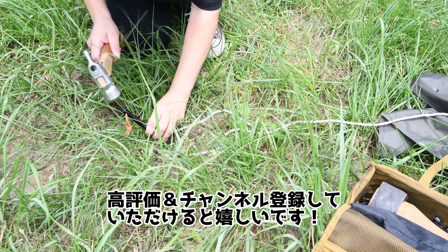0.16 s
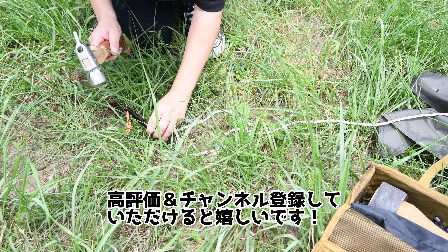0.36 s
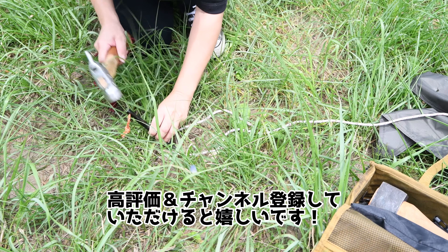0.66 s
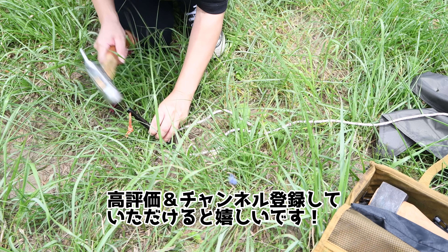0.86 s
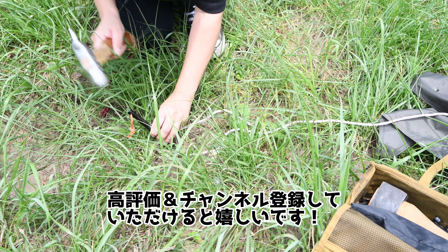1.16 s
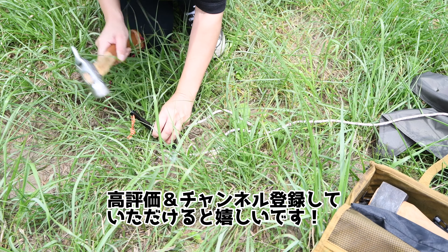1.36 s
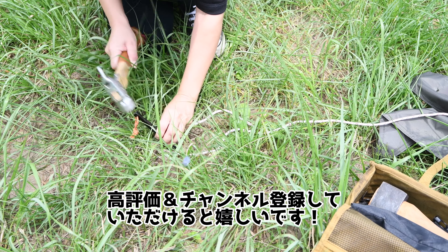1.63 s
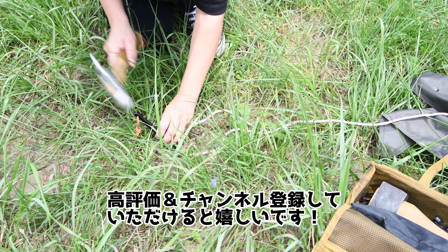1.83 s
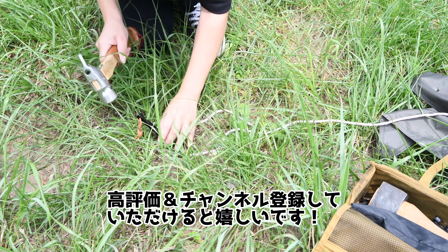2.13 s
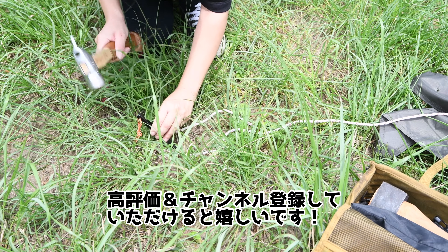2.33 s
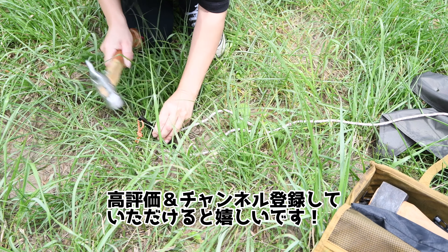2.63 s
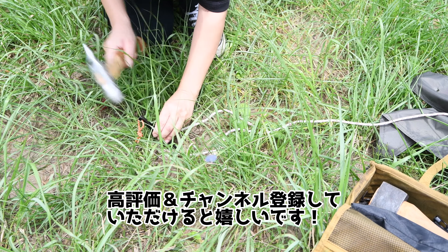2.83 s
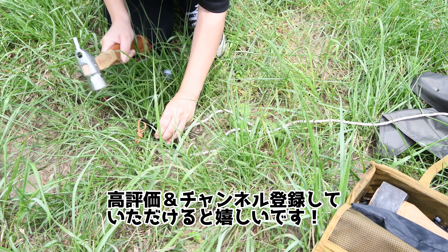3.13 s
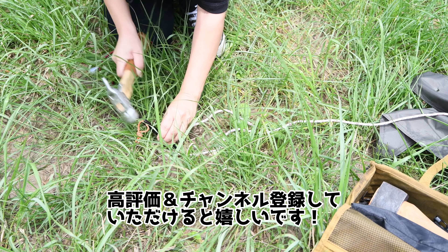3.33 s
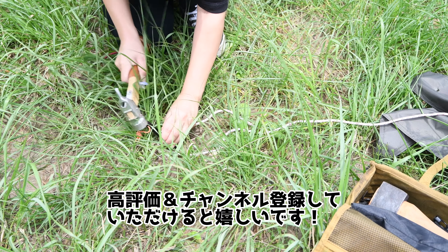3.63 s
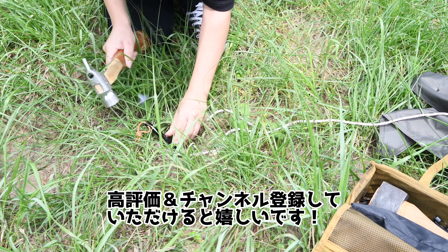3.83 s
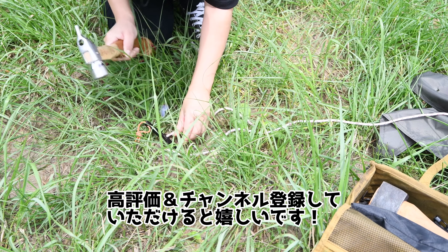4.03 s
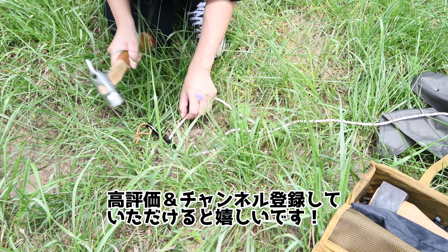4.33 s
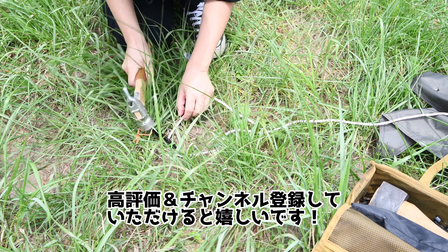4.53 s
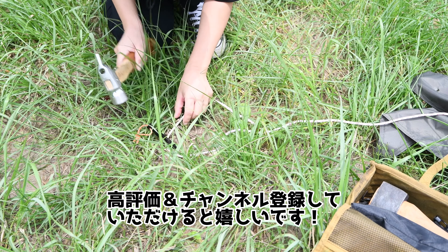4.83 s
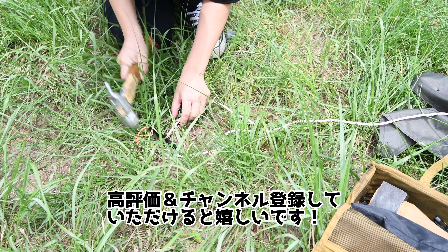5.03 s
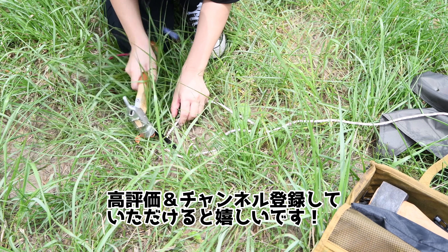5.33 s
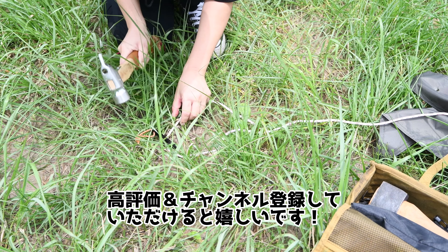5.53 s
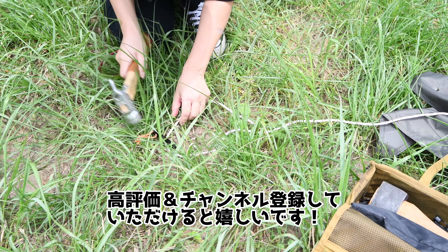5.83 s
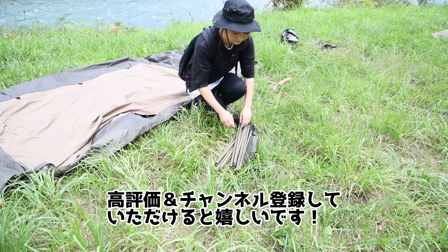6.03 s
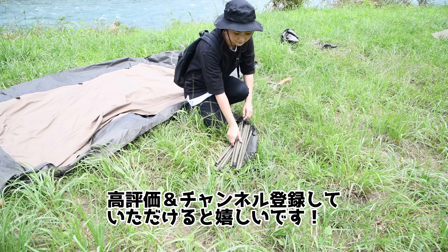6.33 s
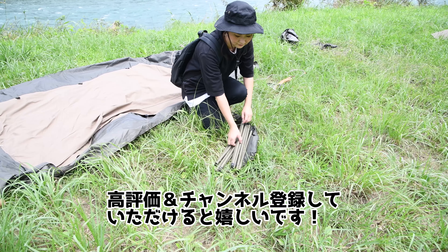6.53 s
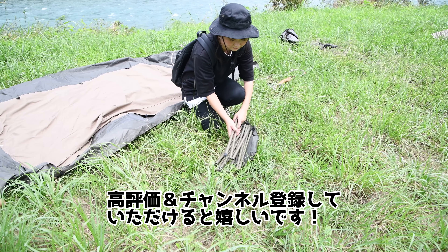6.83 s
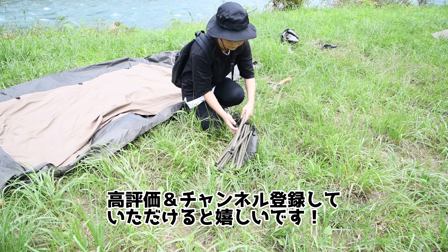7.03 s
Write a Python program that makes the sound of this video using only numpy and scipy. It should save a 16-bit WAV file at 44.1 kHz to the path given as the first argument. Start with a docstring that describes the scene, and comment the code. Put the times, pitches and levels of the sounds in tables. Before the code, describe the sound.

Outdoors on a quiet river bank, a hammer taps a tent peg close to the microphone. The sharp metallic clicks die away at once, some with a tiny rebound, and two brief pauses split them into three runs. Near the end the hammering stops and the background shifts to faint insects and a far, pulsing engine, as a few tent poles knock lightly together. The river hisses softly throughout.

```python
"""A grassy river bank. A small steel hammer drives a tent peg into turf: three runs of short, bright
blows, some with a light rebound. In the last run the peg knocks more and ticks higher; the soil damps it
within milliseconds and the grass scatters a brief tail. Behind it lie the river, a low hum and hiss.
From 6 s we are beside the tent: poles clack softly among faint insects while a far engine throbs."""
import sys
import numpy as np
from scipy import signal
from scipy.fft import rfft, irfft
from scipy.io import wavfile
from scipy.ndimage import uniform_filter1d

SR = 44100
rng = np.random.default_rng(int(sys.argv[2]) if len(sys.argv) > 2 else 0)


def transcribe(signal):
    """Save signal, clipped to [-1, 1], as a 16-bit WAV file at the path in sys.argv[1]."""
    frames = np.atleast_2d(signal).T
    limited = np.clip(frames, -1, 1)
    pcm = np.round(limited * 32767).astype(np.int16)
    wavfile.write(sys.argv[1], SR, pcm)


N = 316364
T = np.arange(N) / SR
SIZE, LEAD = 4096, 64  # samples in one hit, and ahead of its attack
AGE, HZ = np.arange(SIZE) / SR, np.fft.rfftfreq(SIZE, 1 / SR)
EARS = np.array([[1], [-1]])  # left, right
AT_TENT_S = 6.006

# Hammer blows. Each row: start in seconds, strength in dB, brightness in dB per octave, clack in dB,
# ping in dB, return time of the wave in the peg in ms, its reflection from -1 to 1.
HAMMER_BLOWS = [(0.6605, -8.5, -2, -2, -3.5, 0.17, 0.34), (1.028, -2, -2.5, -1.5, 1, 0.63, 0.42),
                (1.3561, 2.5, .3, -2.5, 3.5, 0.419, 0.33), (1.6629, 1.3, 1, 8.5, 4, 0.42, 0.43),
                (1.9829, -0.1, -0.5, 4, 4, 0.364, 0.34), (2.6328, 4.5, 1, -5, 6, 0.27, 0.3),
                (3.0008, 4, -0.5, -2.5, 7, 0.35, .3), (3.3473, 5.5, 1.5, 1.5, -6, 0.198, .27),
                (3.6925, 4.5, -1.4, -4, 3, 0.31, 0.21), (4.2708, 0.1, 0, -1.5, -4.6, 0.345, 0.44),
                (4.6424, 0, 0.5, -4, -8, 0.33, .38), (5.033, 1, -1.5, -4.5, 7, .29, 0.31),
                (5.4063, 1, 0.5, 3, 0, 0.39, -0.27), (5.7831, -0.4, -1, 1, -2, .2, 0.3)]
# The hammer falls back on the peg. Each row: start in seconds, strength in dB.
HAMMER_REBOUNDS = [(1.6944, -31), (2.0060, -31), (3.3730, -28), (3.721, -23), (4.6720, -31), (5.0526, -27),
                   (5.4244, -36), (5.8046, -28)]
# The voice of the peg standing tall. Each row: frequency in Hz, level in dB.
TALL_PEG_EQ = [(150, -29), (450, -26), (1200, -19), (1900, -18), (2400, -8.5), (3050, -0.5), (3450, -1),
               (3950, -5.5), (4700, 2), (5900, 3), (7400, 5), (9000, -2), (10800, -0.8), (12800, -7.5),
               (14200, -4.5), (15500, 4.5), (17500, -11)]
# Sunk, it knocks more, loses its middle and ticks higher. Each row: frequency in Hz, change in dB.
SUNK_PEG_EQ = [(350, 10), (700, 10), (1200, 7.5), (3000, -4.5), (4100, 3), (5000, -6), (6800, -5.5),
               (7900, -5), (9500, 4.5), (13000, 6.5), (15500, .4)]
# How knocky and high-ticking the peg sounds; it jumps up around 4 s.
# Each row: time in seconds, amount from 0 to 1.
PEG_SUNK_TONE = [(.66, 0.3), (3.35, 0), (4.27, 1), (5.78, 0.8)]
# The ring of peg and hammer head. Each row: frequency in Hz, t60 in seconds, level in dB.
STEEL_MODES = [(3080, 0.031, -82), (3570, 0.039, -47), (5200, 0.013, -63), (7470, 0.015, -43.5),
               (10700, .022, -49), (11600, 0.022, -61), (15500, .012, -57)]
# The clack of a peg bent by an off-centre hit. Each row: frequency in Hz, share from 0 to 1.
CLACK_BAND = [(2450, 0), (2900, 1), (3300, 1), (3800, 0)]
# The top ping of a square hit. Each row: frequency in Hz, share from 0 to 1.
PING_BAND = [(13000, 0), (15500, 1)]
# The two microphones face the peg differently. Each row: frequency in Hz, left minus right in dB.
PEG_BALANCE = [(2500, -2), (5000, -1.5), (7700, -0.5), (10000, -2.5), (12500, -3), (15500, 1)]
# Dull bumps on the turf between blows. Each row: start in seconds, level in dB, pitch in Hz.
TURF_BUMPS = [(4.468, -41.5, 134), (4.802, -41, 107)]
# Tent poles knock together. Each row: start in seconds, strength in dB, brightness in dB per octave.
POLE_KNOCKS = [(6.659, -7, -1), (6.9637, 3, -15), (6.968, -7, -0.5), (6.989, -6, -6), (6.991, -3.5, 0.5),
               (6.996, -5, -1.5), (7.014, -13, -4)]
# The ring of the poles. Each row: frequency in Hz, t60 in seconds, level in dB.
TUBE_MODES = [(1130, 0.019, -49), (1485, 0.026, -42.5), (1780, .02, -46), (2190, 0.032, -47.5),
              (2600, .025, -50), (2930, 0.025, -49), (4260, 0.046, -48), (5040, 0.03, -55),
              (7700, .02, -59)]
# Grass and cloth. Each row: peak time in seconds, half-width in seconds, centre in Hz, level in dB.
SOFT_RUSTLES = [(2.69, .04, 10200, -63), (6.22, .11, 13000, -68)]
# Insects in the grass. Each row: centre in Hz, bandwidth in Hz, level in dB.
INSECT_TRILLS = [(7700, 90, -70.5), (8130, 100, -71)]
# The engine's low rumble. Each row: frequency in Hz, relative level in dB.
RUMBLE_EQ = [(70, -30), (95, 0), (125, -3), (165, -31)]
# River and far land, by the peg and by the tent. Each row: frequency in Hz, relative level in dB.
RIVER_PEG_EQ = [(15, -42), (25, -17), (40, -8.5), (55, -6), (95, -8), (170, -7), (270, -9), (420, -8.5),
                (560, -13), (850, -14), (1150, -13), (2000, -16), (3200, -21.5), (5500, -31)]
RIVER_TENT_EQ = [(15, -40), (25, -5), (48, -12), (86, -3), (152, -10.5), (195, -8.5), (239, -12),
                 (299, -9.5), (350, -11.5), (392, -11.5), (645, -16.5), (1950, -18), (5500, -31),
                 (7150, -66), (12100, -120)]
# Hiss with the microphone's resonance, at both spots. Each row: frequency in Hz, relative level in dB.
HISS_PEG_EQ = [(2500, -40), (5000, -13.5), (6300, -8.5), (7300, -5.5), (8350, 0.5), (9200, -6.5),
               (10200, -13.5), (12000, -17), (15700, -14.5), (16100, -45)]
HISS_TENT_EQ = [(2500, -28), (5000, -21), (6300, -9.5), (6900, -6), (7950, 0), (9000, -6), (10200, -15),
                (12000, -16), (15700, -13.5), (16100, -45)]
# How alike the bed is in both ears. Each row: frequency in Hz, likeness from 0 to 1.
BED_LIKENESS = [(130, 1), (290, .998), (640, .96), (1410, .8), (3100, .36), (6800, .02)]
# How the bed leans. Each row: frequency in Hz, left minus right in dB.
BED_BALANCE = [(380, 0), (700, -1), (1290, -2), (2400, -1.5), (8100, -1.5), (15000, -3)]


def hammer(lead_s=.0006, blow_db=-0.46, rebound_db=-1.0, round_trip=0.3, tall_pan_db=2.5, sunk_pan_db=2.2):
    """Each blow meets the peg at another spot and sends a wave down it; some bounce lightly."""
    out = np.zeros((2, N))
    for s, db, bright_db, clack_db, ping_db, return_ms, reflection in HAMMER_BLOWS:
        spot_db = clack_db * along(CLACK_BAND, HZ) + ping_db * along(PING_BAND, HZ)
        contact_db = contact(s, blow_db + db, bright_db) + spot_db
        # the wave comes back from where the soil grips the peg, weaker on each trip
        echo = reflection * np.exp(-2j * np.pi * HZ * return_ms / 1000)
        wave_return = (1 + echo) / (1 - round_trip * echo)
        pan_db = tall_pan_db + sunk_tone(s) * (sunk_pan_db - tall_pan_db)
        add(out, s - lead_s, peg_click(contact_db, wave_return) * undb(EARS * pan_db / 2))
    for s, db in HAMMER_REBOUNDS:
        add(out, s - lead_s, peg_click(contact(s, rebound_db + db, bright_db=-1.5), wave_return=1))
    return out


def peg_click(contact_db, wave_return, spread_s=0.0007, spread_hz=4700, ear_lag_s=.000016):
    """Steel on steel: a click that rings the peg and scatters in the grass."""
    click = causal(along(TALL_PEG_EQ, HZ) + contact_db) * wave_return
    # bending waves carry the treble faster, so the click is a very short falling chirp
    click = click * np.exp(-2j * np.pi * spread_s * 2 * np.sqrt(HZ * spread_hz))
    # it reaches the left side first
    stereo = undb(EARS * along(PEG_BALANCE, HZ) / 2) * np.exp(1j * np.pi * EARS * HZ * ear_lag_s)
    response = grass() + rfft(ring(STEEL_MODES, detune=0.011, scatter_db=-2.0))
    return irfft(stereo * click * response)


def contact(s, db, bright_db, pivot_hz=7000):
    """The EQ of one touch in dB: the sunk tone sets the body, the hardness of the hit the tilt."""
    octaves = np.log2(np.maximum(HZ / pivot_hz, .3))
    return db + bright_db * octaves + sunk_tone(s) * along(SUNK_PEG_EQ, HZ)


def sunk_tone(s):
    """How knocky and high-ticking the peg sounds at time s, from 0 to 1."""
    return np.interp(s, *np.transpose(PEG_SUNK_TONE))


def grass(near_db=-9.0, near_t60=0.013, far_db=-24, far_t60=0.06, onset_s=0.000702, width=0.34):
    """Spectrum of the direct sound plus scatter off blades and ground, a little different per ear."""
    near = undb(near_db) * unit(fade(near_t60))
    far = undb(far_db) * unit(fade(far_t60))
    noise = unit(rng.standard_normal(SIZE) + width * rng.standard_normal((2, SIZE)))
    tail = noise * (near + far) / np.sqrt(SIZE)
    return 1 + rfft(tail) * np.exp(-2j * np.pi * HZ * onset_s)


def turf(thud_db=-42.5, loss_db=13, thud_hz=98, t60=0.059):
    """Soft ground thuds for a few low cycles under each blow, louder when the peg sounds knocky."""
    out = np.zeros((2, N))
    thuds = [(s, thud_db + db - loss_db * (1 - sunk_tone(s)), thud_hz) for s, db, *_ in HAMMER_BLOWS]
    for s, db, hz in thuds + TURF_BUMPS:
        add(out, s, undb(db) * fade(t60) * np.sin(2 * np.pi * hz * AGE))
    return out


def poles(scrape_db=-49, scrape_t60=0.021, pivot_hz=1500):
    """Bundled tubes knock and scrape briefly, some touches bright, some dull."""
    out = np.zeros((2, N))
    octaves = np.log2(np.maximum(HZ / pivot_hz, 1))
    for s, db, bright_db in POLE_KNOCKS:
        scrape = undb(scrape_db) * fade(scrape_t60) * rng.standard_normal((2, SIZE))
        knock = ring(TUBE_MODES, detune=0.033, scatter_db=1.5) + scrape
        touch = causal(db + bright_db * octaves)
        scatter = grass(near_db=-1.5, near_t60=.03, onset_s=0.000507)
        add(out, s, irfft(rfft(knock) * touch * scatter))
    return out


def rustles(flicker_db=1.0):
    """Blades and fabric brush softly, an airy flicker in the top end."""
    out = 0
    for s, width_s, hz, db in SOFT_RUSTLES:
        band = signal.butter(2, [hz * .82, hz * 1.2], "bandpass", fs=SR, output="sos")
        brush = unit(signal.sosfilt(band, rng.standard_normal((2, N))))
        out = out + brush * undb(db + flicker_db * walk(120)) * swell(s, width_s)
    return out


def insects():
    """Thin, steady trills of narrow-band noise, heard only beside the tent."""
    hz = np.fft.rfftfreq(N, 1 / SR)
    out = 0
    for centre, width, db in INSECT_TRILLS:
        resonance = 1 / (1 + 2j * (hz - centre) / width)
        out = out + undb(db) * unit(irfft(resonance * rfft(rng.standard_normal((2, N))), N))
    return out * (T >= AT_TENT_S)


def engine(beat_hz=3.49, beat_share=0.77, crest_s=6.63):
    """A far engine: a drone that beats like two close tones swells over its sub-octave and a rumble."""
    throb = np.abs(1 + beat_share * np.exp(2j * np.pi * beat_hz * (T - crest_s)))
    drone = undb(-57.5) * throb * tone(hz=195, wander_hz=0.96, waver_db=1.0)
    sub_octave = undb(-66.5) * tone(hz=97.2, wander_hz=2, waver_db=4)
    rumble = wash(RUMBLE_EQ, db=-64, top_hz=6000)
    return swell(peak_s=6.67, width_s=0.51) * drone + sub_octave + rumble


def riverside():
    """The bed: river, hiss and a low hum throughout, joined by the engine beside the tent."""
    at_peg = wash(RIVER_PEG_EQ, db=-53.5, top_hz=5940, lean=0.91)
    at_peg += wash(HISS_PEG_EQ, db=-57.5, top_hz=20000, lean=1)
    at_tent = wash(RIVER_TENT_EQ, db=-52.5, top_hz=6000)
    at_tent += wash(HISS_TENT_EQ, db=-56.0, top_hz=20000)
    hum = undb(-62.0) * tone(hz=76.5, wander_hz=2.1, waver_db=1.0)
    return hum + np.where(T < AT_TENT_S, at_peg, at_tent + engine())


def wash(eq, db, top_hz, lean=0):
    """Steady diffuse noise: mono in the bass, wide in the treble."""
    hz = np.fft.rfftfreq(N, 1 / SR)
    alike = along(BED_LIKENESS, hz)
    mid, side = rfft(rng.standard_normal((2, N)))
    noise = np.sqrt(1 + alike) * mid + EARS * np.sqrt(1 - alike) * side
    colour = undb(along(eq, hz) + lean * EARS * along(BED_BALANCE, hz) / 2)
    rolloff = 1 / np.hypot(1, (hz / top_hz) ** 4)
    return undb(db) * unit(irfft(noise * colour * rolloff, N))


def tone(hz, wander_hz, waver_db):
    """A far-off sine of rms 1 that wavers in pitch and level."""
    phase = 2 * np.pi * np.cumsum(hz + wander_hz * walk(14)) / SR
    return unit(np.sin(phase) * undb(waver_db * walk(8.2)))


def ring(modes, detune, scatter_db):
    """Damped modes, a little different at every touch."""
    hz, t60, db = np.transpose(modes)[:, :, None]
    shift, size = rng.standard_normal((2, len(modes), 1))
    partials = np.cos(2 * np.pi * hz * (1 + detune * shift) * AGE)
    return np.sum(undb(db + scatter_db * size) * fade(t60) * partials, axis=0)


def causal(db):
    """Spectrum of the tightest click that has these levels at HZ."""
    cepstrum = irfft(np.log(undb(db)))
    cepstrum[1:SIZE // 2] *= 2
    cepstrum[SIZE // 2 + 1:] = 0
    return np.exp(rfft(cepstrum))


def fade(t60):
    """A decay of 60 dB in t60 seconds."""
    return np.exp(-np.log(1000) * AGE / t60)


def swell(peak_s, width_s):
    """A bell-shaped fade in and out."""
    return np.exp(-((T - peak_s) / width_s) ** 2 / 2)


def walk(rate_hz):
    """Smooth random drift with a spread near 1."""
    k = int(SR / rate_hz)
    held = np.repeat(rng.standard_normal(N // k + 1), k)
    return 1.31 * uniform_filter1d(uniform_filter1d(held, k), k)[:N]


def add(out, s, sound):
    """Mix a hit in at time s, with LEAD samples of room for its attack."""
    i = int(s * SR) - LEAD
    out[:, i:i + SIZE] += np.roll(sound, LEAD, axis=-1)[..., :N - i]


def along(points, hz):
    """Read a curve on a log-frequency axis."""
    f, value = np.transpose(points)
    return np.interp(np.log(hz + 1), np.log(f), value)


def undb(db):
    """Decibels to gain."""
    return 10 ** (np.asarray(db) / 20)


def unit(x):
    """Scale to rms 1."""
    return x / np.sqrt(np.mean(x ** 2))


def scene():
    """The full mix of the river bank."""
    return hammer() + turf() + poles() + rustles() + riverside() + insects()


def record(dry, top_hz=16350):
    """Clip at full scale and cut the very top."""
    lowpass = signal.firwin(161, top_hz, window=("kaiser", 8), fs=SR)
    return signal.fftconvolve(np.clip(dry, -1, 1), lowpass[None], mode="same", axes=1)


dry = scene()
out = record(dry)
transcribe(out)
```